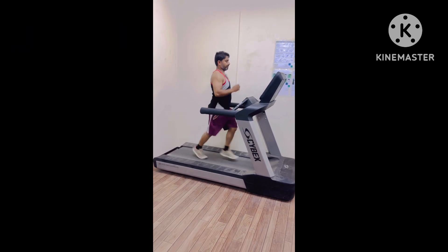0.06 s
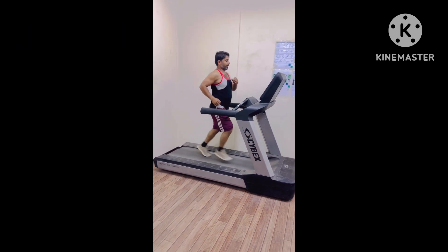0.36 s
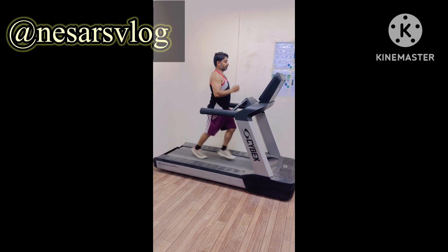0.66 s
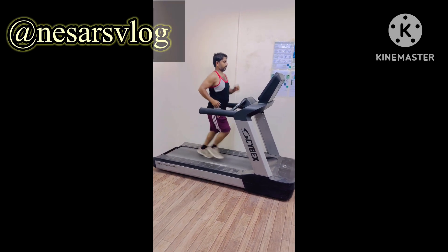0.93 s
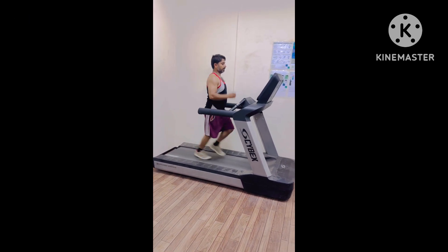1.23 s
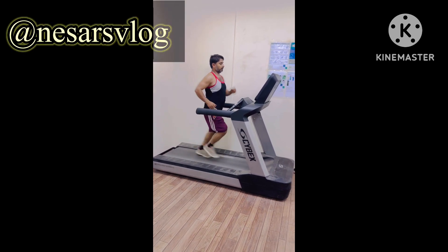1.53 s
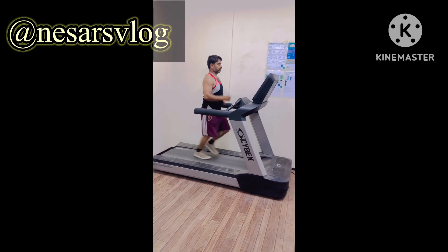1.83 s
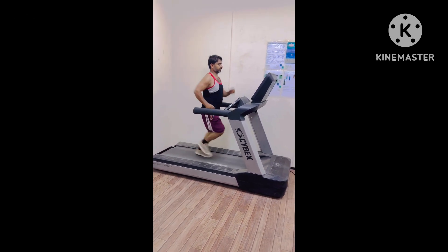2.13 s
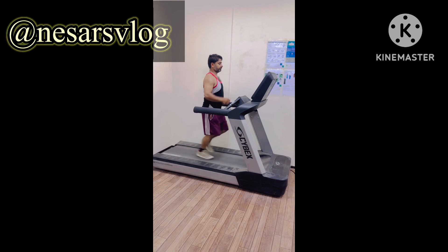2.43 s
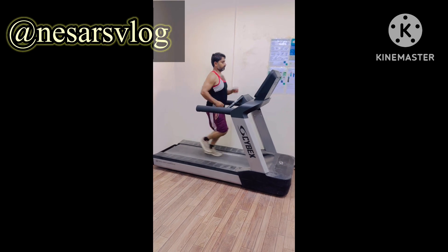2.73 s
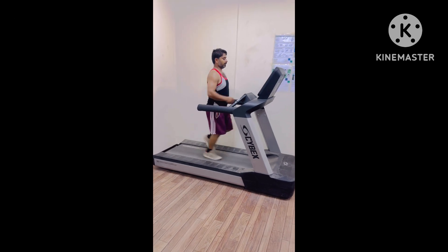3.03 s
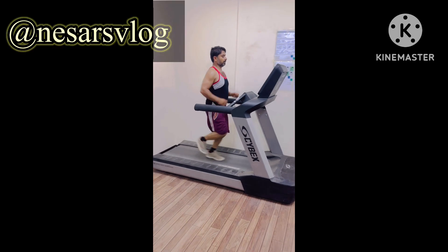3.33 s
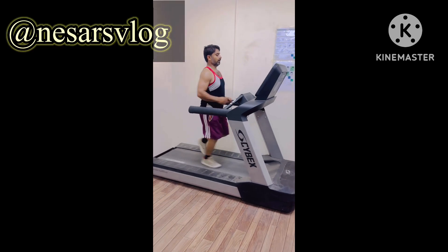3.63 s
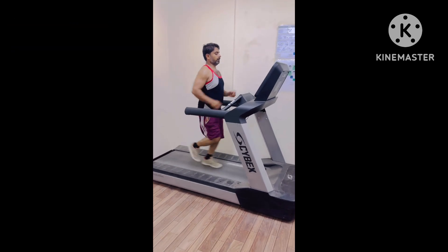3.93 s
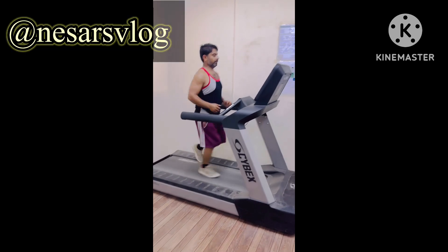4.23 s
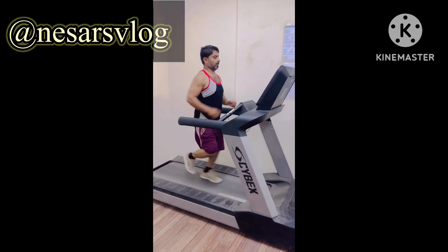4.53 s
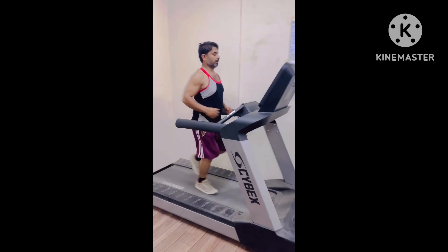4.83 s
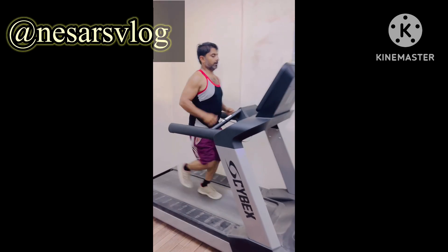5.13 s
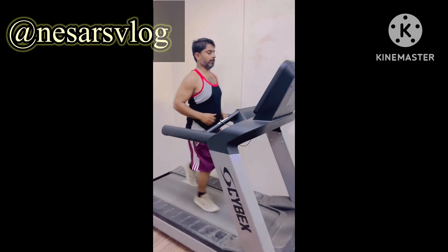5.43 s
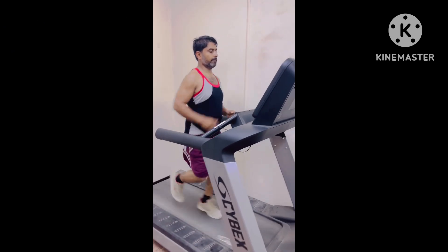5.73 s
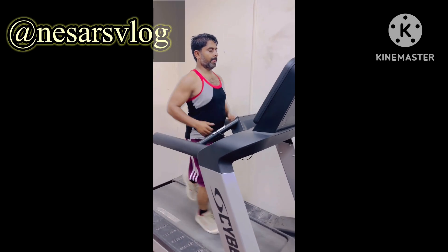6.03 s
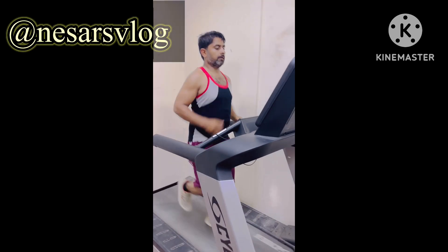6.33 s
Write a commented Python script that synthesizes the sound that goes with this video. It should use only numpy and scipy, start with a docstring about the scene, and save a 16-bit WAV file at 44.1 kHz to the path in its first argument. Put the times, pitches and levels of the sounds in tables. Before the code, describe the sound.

Regular jogging steps thump on a humming treadmill, with a thin motor whine and a swish of clothing at each stride.

```python
"""A runner jogs on a treadmill in a small gym room while a phone is carried slowly closer.
From the start, two shafts hum, the cover rings and the belt whirs over the deck. About every 0.3 s a
foot slaps, thuds, rubs the belt and loads the motor drive, whose switching whine swells; clothes swish
in time. From 0.8 s on, some steps knock hollow or scuff. The hum grows after 3.3 s and peaks near
5.3 s; the frame ticks once just before the end."""
import sys
import numpy as np
from scipy import signal
from scipy.fft import rfft, irfft, next_fast_len
from scipy.io import wavfile
from scipy.ndimage import uniform_filter1d

SR = 44100
rng = np.random.default_rng(int(sys.argv[2]) if len(sys.argv) > 2 else 0)


def persist_wave(psi):
    """Save psi, clipped to +-1, as 16-bit WAV."""
    counts = np.round(np.clip(psi, -1, 1) * 32767).astype(np.int16)
    wavfile.write(sys.argv[1], SR, np.atleast_2d(counts).T)


N = 280917
TIME_S = np.arange(N) / SR
FREQ_HZ = np.maximum(np.arange(N // 2 + 1) * SR / N, 1e-3)

# footfalls: start_s, thud_db, slap_db, whine_swell_db
FOOTFALLS = [(-0.09, -32, -40, -1), (0.227, -22, -30.5, -0.5), (0.53, -38, -29, -1.5),
             (0.795, -29, -31.5, 0.5), (1.118, -42, -34.5, 1), (1.41, -19.5, -41, -2),
             (1.723, -21.5, -36, -0.5), (2.035, -38, -32, -0.5), (2.357, -21, -32, 0.5),
             (2.68, -26, -34, 0), (2.994, -18.5, -27.5, 0.5), (3.309, -25, -28.5, .5), (3.587, -27, -34, 0),
             (3.906, -23.5, -30, .5), (4.211, -22, -33, 2), (4.491, -18, -34, -1.5), (4.809, -37, -48, 0.5),
             (5.1, -31, -35, 0), (5.416, -21, -29.5, -1.5), (5.729, -23, -32, 0.5), (6.024, -25, -28, -2),
             (6.335, -36, -45, -1)]
# spectrum of sole slap and frame tick: freq_hz, relative_db
SLAP_SPECTRUM = [(150, -14.5), (400, 4), (800, 15), (1300, 11.5), (2200, 11), (3300, -4.5), (6000, -10),
                 (14000, -46.5)]


def undb(db):
    """Decibels to gain."""
    return 10 ** (np.asarray(db) / 20)


def unit(x):
    """Scale to rms 1."""
    return x / np.sqrt(np.mean(x ** 2))


def curve(rows):
    """Join (time_s, value) rows by straight lines."""
    return np.interp(TIME_S, *np.transpose(rows))


def colour(points):
    """Gain per frequency from (freq_hz, level_db) points."""
    hz, db = np.transpose(points)
    return undb(np.interp(np.log(FREQ_HZ), np.log(hz), db))


def resonances(modes):
    """Gain per frequency of steep-skirted (centre_hz, width_hz, rms_db) resonances."""
    power = 0
    for hz, width_hz, db in modes:
        bell = 1 / (1 + ((FREQ_HZ - hz) / (.78 * width_hz)) ** 2) ** 2
        power = power + undb(db) ** 2 * bell / (bell.sum() * SR / N)
    return np.sqrt(power)


def walk(rate_hz):
    """Random held levels, smoothed twice; rms 1."""
    hold = int(SR / rate_hz)
    held = np.repeat(rng.standard_normal(N // hold + 2), hold)[rng.integers(hold):][:N]
    return unit(uniform_filter1d(uniform_filter1d(held, hold), hold))


def blows(starts_s, levels_db, rise_s, decay_s):
    """Impact envelope: quick rise, exponential fall."""
    age_s = np.maximum(TIME_S - starts_s[:, None], 0)
    return undb(levels_db) @ ((1 - np.exp(-age_s / rise_s)) * np.exp(-age_s / decay_s))


def swells(starts_s, levels_db, length_s):
    """Soft-contact envelope: half a sine each."""
    progress = np.clip((TIME_S - starts_s[:, None]) / length_s, 0, 1)
    return undb(levels_db) @ np.sin(np.pi * progress)


def shaft_tone(turns, order, rms_db):
    """One harmonic of a turning shaft."""
    return np.sqrt(2) * undb(rms_db) * np.sin(2 * np.pi * (order * turns + rng.random()))


def room_noise(gain):
    """Noise at two microphone ports: shared direct sound, unrelated reflections."""
    # reflected over direct sound: freq_hz, ratio_db
    diffuse = [(35, -29), (90, -29), (220, -15), (400, -5), (650, 2), (1500, -2), (2600, 5), (4000, 0),
               (6500, 0), (9000, -3), (11000, -22), (13500, -22), (14500, -7)]
    wet = colour(diffuse)
    noise = rfft(rng.standard_normal((3, N))) * np.sqrt(SR / 2)
    return irfft(gain * (noise[0] + wet * noise[1:]) / np.sqrt(1 + wet ** 2), N)


def unit_noise(spectrum):
    """Coloured room noise at rms 1."""
    return unit(room_noise(colour(spectrum)))


def machine():
    """The frame booms on the drum's third order, over weaker shaft orders and the ringing cover."""
    # main hum along the phone's path: time_s, level_db
    boom = [(0, -23), (1.8, -21.5), (3.3, -22), (4.55, -15.5), (5.25, -13.5), (5.6, -14), (6.3, -15)]
    # drum orders, loudest where the phone crosses a crest of their standing wave in the room:
    # order, away_db, crest_db, crossing_s, half_width_s
    overtones = [(6, -35.5, -30, 4.18, 0.52), (7, -50, -31.5, 5.05, 0.87), (9, -42, -30, 0.12, 0.17),
                 (12, -46.5, -39, 4.1, 0.51)]
    # weak hum of each shaft: order, level_db
    drum_orders = [(8, -48.5)]
    motor_orders = [(2, -39.5), (3, -38.5), (4, -38.5), (8, -49.5), (9, -61)]
    # frame and motor cover modes: centre_hz, width_hz, level_db
    cover_modes = [(58.3, 2.6, -42.5), (305.4, 13, -43.5), (427.8, 8.1, -43.5), (1157, 24, -49),
                   (1212, 20, -55), (1294, 50, -50), (1744, 20, -52.5), (2057, 40, -50.5), (2165, 96, -57)]
    drum_hz = 30.02 + .013 * walk(.93)
    motor_hz = 65.3 + .063 * walk(3.015)
    drum_turns, motor_turns = np.cumsum([drum_hz, motor_hz], axis=1) / SR
    hum = shaft_tone(drum_turns, order=3, rms_db=curve(boom))
    for order, away_db, crest_db, crossing_s, half_width_s in overtones:
        crest = np.exp(-((TIME_S - crossing_s) / half_width_s) ** 2)
        hum += shaft_tone(drum_turns, order, away_db + (crest_db - away_db) * crest)
    for turns, orders in (drum_turns, drum_orders), (motor_turns, motor_orders):
        hum += sum(shaft_tone(turns, order, db + 1.4 * walk(.84)) for order, db in orders)
    return hum + room_noise(resonances(cover_modes))


def ripple(spacing_hz, depth_db, from_hz):
    """Gain per frequency of the many close resonances of deck and room."""
    hz = np.arange(0, SR / 2, spacing_hz)
    ripple_db = depth_db * rng.standard_normal(len(hz)) * (hz > from_hz)
    return undb(np.interp(FREQ_HZ, hz, ripple_db))


def belt(near_db):
    """The belt whirs over deck and rollers, fluttering a little, with a fine hiss on top."""
    # base spectra: freq_hz, density_db
    whir_spectrum = [(15, -85.5), (33, -58), (48, -59.5), (70, -47), (115, -50.5), (150, -49), (175, -58.5),
                     (330, -56), (600, -61.5), (740, -63.5), (950, -66), (1250, -70), (1800, -73),
                     (2250, -75), (2900, -78.5), (3300, -80.5)]
    hiss_spectrum = [(1500, -105), (3500, -89.5), (4800, -87.5), (7500, -85.7), (9500, -86.5), (11000, -94),
                     (15500, -93)]
    # whir along the phone's path: time_s, gain_db
    whir_gain = [(0, -1.5), (1.2, 0), (3.3, 0.5), (4.2, 0.5), (5, -0.16), (6.3, 1.45)]
    roll_off = 1 / np.sqrt(1 + (FREQ_HZ / 4300) ** 8)
    whir_shape = colour(whir_spectrum) * roll_off * ripple(spacing_hz=7, depth_db=1.5, from_hz=350)
    whir = room_noise(whir_shape) * undb(.5 * walk(16) + curve(whir_gain))
    hiss = room_noise(colour(hiss_spectrum)) * undb(.71 * walk(9.8) + near_db)
    return whir + hiss


def drive(near_db):
    """The switching whine rasps; each step loads the motor, so it swells and sags in pitch."""
    # bands near multiples of the carrier: idle_hz, width_hz, idle_db, loaded_db
    whine_bands = [(4062, 45, -66, -53), (4100, 170, -55.5, -52.5), (6050, 220, -60.5, -54.5),
                   (8090, 340, -63.5, -56.5), (10070, 330, -67, -59)]
    lead_s, attack_s, length_s, release_s = .035, .05, .235, .06
    sag_hz, wander_hz, rasp_db = 72, 16, 1.7
    starts_s, _, _, swell_db = np.transpose(FOOTFALLS)
    age_s = TIME_S - starts_s[:, None] + lead_s
    step_loads = np.clip(np.minimum(age_s / attack_s, (length_s - age_s) / release_s), 0, 1)
    load = step_loads.sum(axis=0)
    shift_hz = -sag_hz * load + wander_hz * walk(45)
    bend = np.exp(2j * np.pi * np.cumsum(shift_hz) / SR)
    whine = 0
    for idle_hz, width_hz, idle_db, loaded_db in whine_bands:
        band = room_noise(resonances([(idle_hz, width_hz, 0)]))
        analytic = signal.hilbert(band, next_fast_len(N))[:, :N]
        whine += unit(np.real(analytic * bend)) * undb(idle_db + (loaded_db - idle_db) * load)
    return whine * undb(rasp_db * walk(40) + swell_db @ step_loads + near_db)


def clothes(near_db):
    """Fabric brushes twice a stride with a bright, grainy swish."""
    # brushing fabric: freq_hz, relative_db
    swish_spectrum = [(1200, -12), (3000, -1), (4800, -1.5), (6500, 0), (9800, 1), (11500, 0), (14000, 3),
                      (15500, 3)]
    # landing and push-off: delay_s, length_s, level_db
    brushes = [(.015, .195, -46), (.16, .15, -50)]
    offset_s, stride_s = .135, .3057
    starts_s = np.arange(offset_s - stride_s, TIME_S[-1], stride_s)
    scatter_db = .6 * rng.standard_normal(len(starts_s))
    power = sum(swells(starts_s + delay_s, db + scatter_db, length_s) ** 2
                for delay_s, length_s, db in brushes)
    return unit_noise(swish_spectrum) * undb(1.3 * walk(63) + near_db) * np.sqrt(power)


def deck():
    """Some steps make the deck ring hollow; one makes the frame tick."""
    # deck knocks: start_s, pitch_hz, level_db, decay_s
    knocks = [(.825, 65, -21, 0.053), (2.05, 148.5, -20.5, 0.059), (2.654, 65.5, -24.5, 0.051),
              (3.281, 68, -21, 0.066), (4.742, 305, -27.5, 0.03), (6.266, 252, -27, 0.064)]
    # frame tick: start_s, level_db
    ticks = [(6.266, -24.5)]
    rings = 0
    for start_s, pitch_hz, level_db, decay_s in knocks:
        envelope = blows(np.array([start_s]), [level_db], rise_s=.0042, decay_s=decay_s)
        rings += np.sqrt(2) * envelope * np.sin(2 * np.pi * pitch_hz * (TIME_S - start_s))
    tick = unit_noise(SLAP_SPECTRUM) * blows(*np.transpose(ticks), rise_s=.0003, decay_s=.008)
    return rings + tick


def footfalls():
    """The sole slaps, the deck thuds and the belt rubs under the runner's weight; a few steps scuff."""
    # spectra: freq_hz, relative_db
    thud_spectrum = [(18, -21.5), (34, -27), (46, 0), (62, 5.5), (80, 2), (130, -18.5), (250, -21),
                     (600, -60.5)]
    rub_spectrum = [(200, -6), (700, 8), (1300, 13), (2600, -6), (4500, -24.5), (9000, -30)]
    scuff_spectrum = [(300, -2), (800, 2.5), (1800, 0), (3600, 4.5), (5200, -2), (9000, -3), (14000, -9)]
    # shoe dragging on the belt: start_s, level_db
    scuffs = [(1.095, -41.3), (1.7, -49), (2.35, -45), (2.66, -50), (3.87, -51), (4.17, -48.5), (5.72, -49)]
    starts_s, thud_db, slap_db, _ = np.transpose(FOOTFALLS)
    rub_db = np.full(len(starts_s), -43.5)
    thud = unit_noise(thud_spectrum) * blows(starts_s - .012, thud_db, rise_s=.046, decay_s=.075)
    slap = unit_noise(SLAP_SPECTRUM) * blows(starts_s - .002, slap_db, rise_s=.006, decay_s=.028)
    rub = unit_noise(rub_spectrum) * swells(starts_s - .02, rub_db, length_s=.17)
    scuff = unit_noise(scuff_spectrum) * swells(*np.transpose(scuffs), length_s=.17)
    grit = unit(undb(2 * walk(rate_hz=500)))
    # rubber grips and slips, so both kinds of friction flutter
    rub *= undb(3.5 * walk(50))
    scuff *= undb(1.3 * walk(41))
    return thud + grit * (slap + rub) + scuff


def scene():
    """Treadmill and runner together."""
    # treble rising as the phone nears: time_s, gain_db
    approach = [(0, -0.7), (1.2, 0.5), (6.3, 3)]
    near_db = curve(approach)
    return machine() + drive(near_db) + belt(near_db) + footfalls() + deck() + clothes(near_db)


def record(dry):
    """The two ports colour and delay the sound differently; the ends are faded in a few milliseconds and the
    phone cuts the top."""
    # port balance: freq_hz, left_minus_right_db
    balance = [(100, .1), (300, .3), (650, 2.8), (1300, 2.3), (2200, .2), (8000, 0)]
    # left port behind right: freq_hz, lag_rad
    port_lag = [(0, 0), (550, .25), (4000, .2), (5000, 1.9), (6000, .6), (10000, 2.3), (10800, 3.1),
                (13500, 3.2), (14800, 4.2)]
    fade_s, top_hz = .006, 15700
    fade = np.minimum(np.minimum(TIME_S, TIME_S[::-1]) / fade_s, 1)
    log_ratio = np.log(colour(balance)) - 1j * np.interp(FREQ_HZ, *np.transpose(port_lag))
    port_gains = np.exp(log_ratio * np.array([[.5], [-.5]]))
    ports = irfft(rfft(dry * fade) * port_gains, N)
    return signal.sosfilt(signal.ellip(10, .1, 80, top_hz, fs=SR, output="sos"), ports)


dry = scene()
out = record(dry)
persist_wave(out)
```